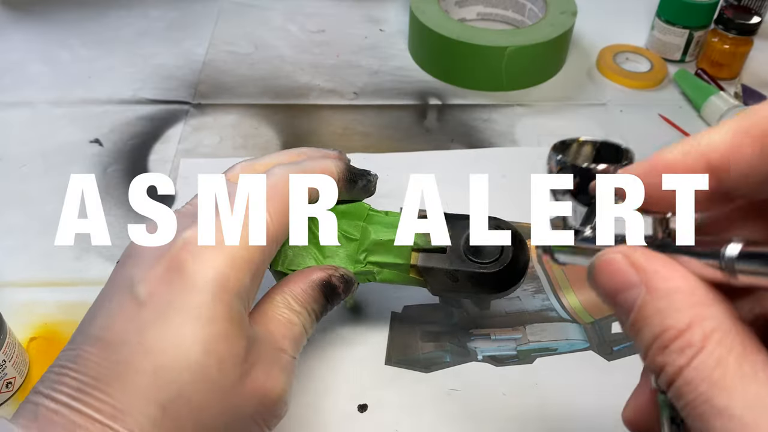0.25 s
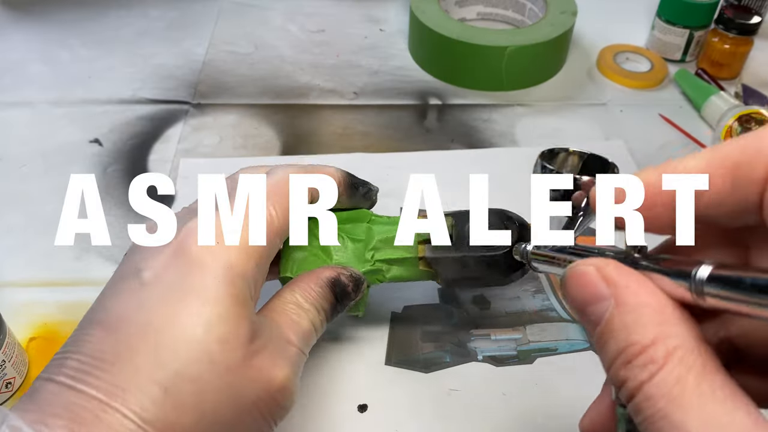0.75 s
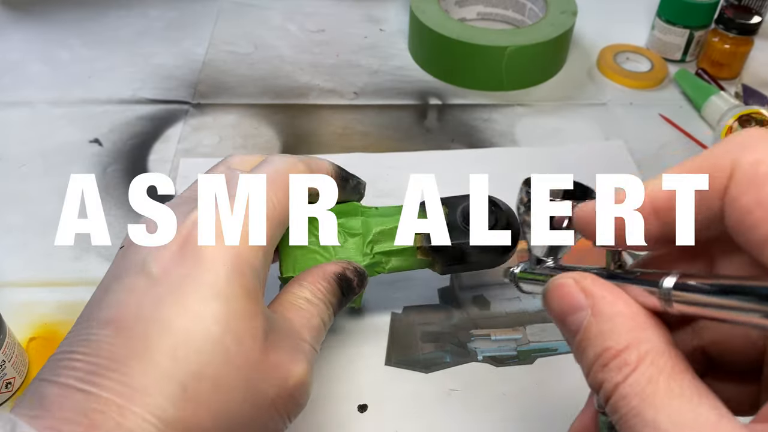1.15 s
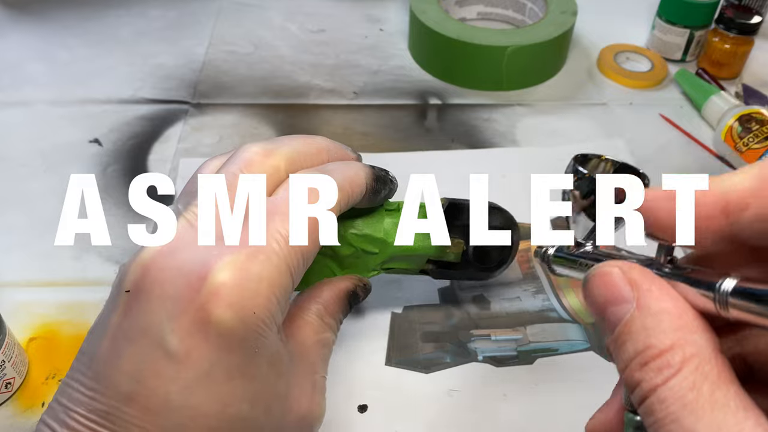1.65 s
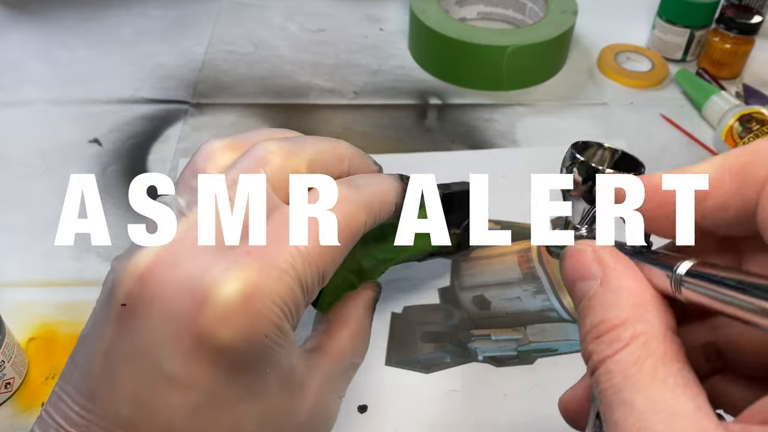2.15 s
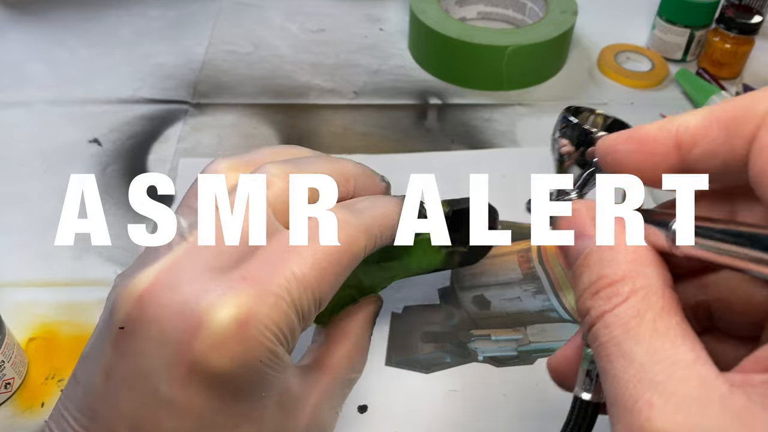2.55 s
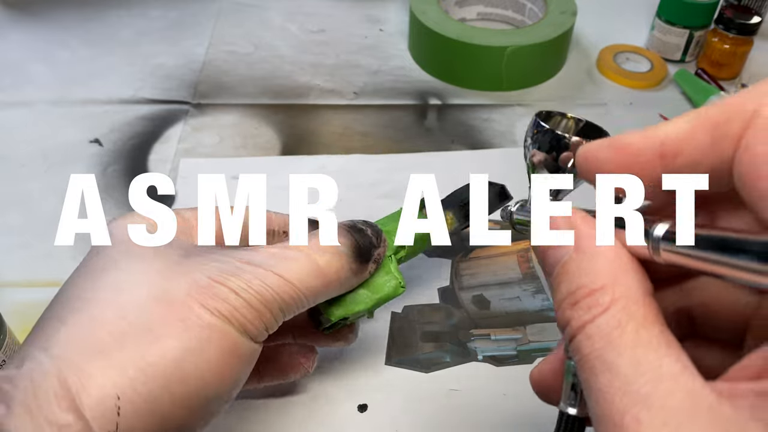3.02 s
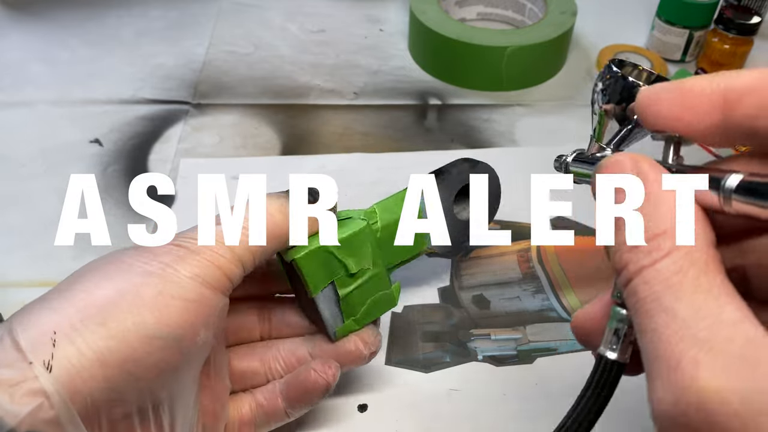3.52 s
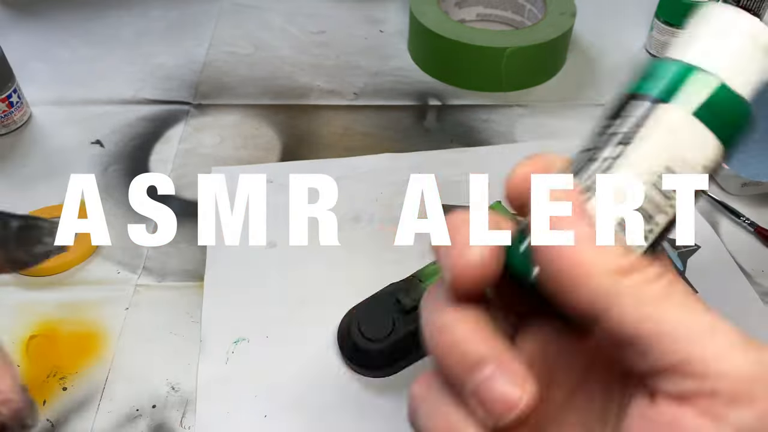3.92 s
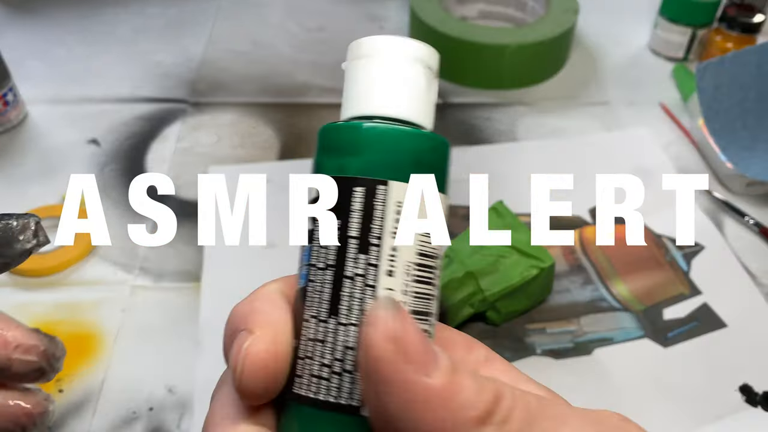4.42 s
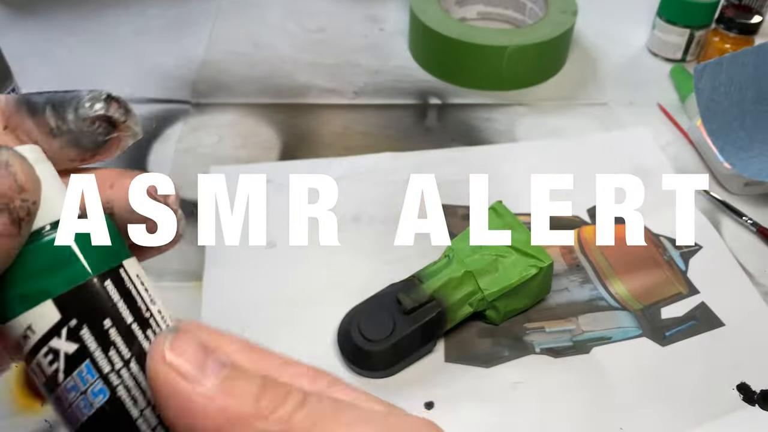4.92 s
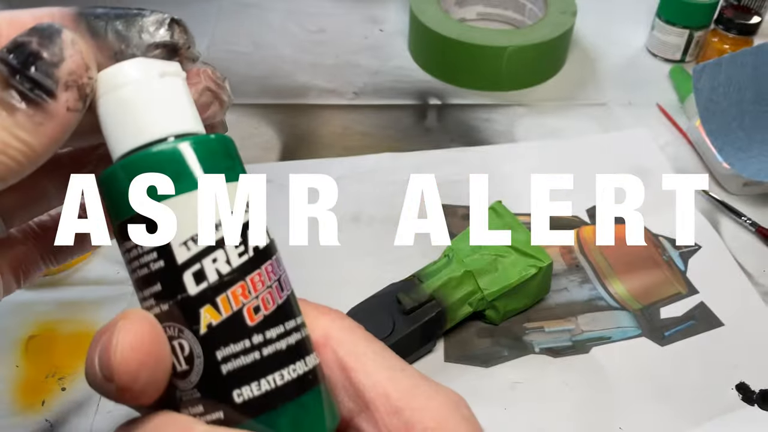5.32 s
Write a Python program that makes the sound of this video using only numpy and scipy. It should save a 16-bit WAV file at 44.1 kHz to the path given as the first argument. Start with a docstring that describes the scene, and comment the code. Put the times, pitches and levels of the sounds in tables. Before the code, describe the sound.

An airbrush hisses in six short bursts over a faint buzzing compressor with a steady high tone, then fingers rub and tap a plastic bottle.

```python
"""An airbrush sprays a small model part in six short bursts: turbulent jet noise, gated by a valve.
From the start its piston compressor buzzes, strokes exciting housing modes near 2 kHz, beside valve and fan.
After four bursts the trigger clicks as it springs back; the compressor sound fades before the last burst.
Then gloved fingers turn a plastic paint bottle: friction noise and small impacts.
Behind them lies low room noise, stronger near the end, where a faint electronic whine joins it."""
import sys
import numpy as np
from scipy import signal
from scipy.fft import rfft, irfft
from scipy.io import wavfile
from scipy.ndimage import uniform_filter1d, map_coordinates

SR = 44100
rng = np.random.default_rng(int(sys.argv[2]) if len(sys.argv) > 2 else 0)


def master(y):
    """Save y as 16-bit WAV."""
    cut = np.clip(np.atleast_2d(y).T, -1, 1)
    pcm = np.round(cut * 32767)  # scale
    wavfile.write(sys.argv[1], SR, pcm.astype(np.int16))


N = 245637
T = np.arange(N) / SR  # s
HZ = np.maximum(np.fft.rfftfreq(N, 1 / SR), 1)  # kept above zero for the logarithm
BOTTLE_S = 3.945  # s, spraying is over; the room noise steps up and the whine begins

# Trigger pulls: air on t/s, air off t/s, opening time t/s, closing time t/s, then levels at the usual jet:
# low rush at start level/dB, at end level/dB, edge turbulence at start level/dB, at end level/dB
PULLS = [(-.05, 0.315, .01, 0.01, -48, -46, -40, -44), (0.526, 1.236, 0.012, 0.0076, -46, -54, -41, -38),
         (1.44, 1.793, 0.0032, 0.0097, -41.5, -44.5, -37, -43),
         (1.999, 2.623, 0.0067, 0.017, -46.5, -45, -41.5, -38),
         (2.931, 3.282, .014, 0.007, -43.5, -40, -38.5, -37),
         (3.653, 3.944, 0.013, 0.0017, -45, -46, -46.5, -44)]
# Spectrum of the turbulent air: f/Hz, level/dB
SPRAY_COLOUR = [(50, -55), (110, -26), (250, -15), (520, -4.5), (1150, -2), (1700, 5.5), (2350, 2),
                (3100, 3), (4200, -3), (5500, 1), (7200, -1), (10200, -2), (13000, -4.5), (16000, -0.5)]


def amp(db):
    """Level definition: decibels to amplitude ratio."""
    return 10 ** (np.asarray(db) / 20)


def rms(x):
    """Effective value: root mean square, kept above zero."""
    return np.sqrt(np.mean(x ** 2)) + 1e-12


def curves(rows):
    """Linear interpolation: each column of a table joined by straight lines in time."""
    s, *columns = np.transpose(rows)
    return [np.interp(T, s, c) for c in columns]


def shape(points):
    """Spectral envelope: gain at every frequency, in dB linear over log frequency."""
    hz, db = np.transpose(points)
    return amp(np.interp(np.log(HZ), np.log(hz), db))


def colour(x, gain):
    """Linear filtering: multiply the spectrum by a gain for every frequency."""
    return irfft(rfft(x) * gain, N)


def noise(gain):
    """Filtered white noise: a random signal of the given spectrum and rms 1."""
    x = colour(rng.standard_normal(N), gain)
    return x / rms(x)


def walk(rate):
    """Low-pass noise: a smooth random fluctuation of rms 1, moving about rate times a second."""
    return noise(1 / (1 + (HZ / rate) ** 4))


def swell(start, end):
    """Smooth window: one rise and fall, 0-1, with soft skirts."""
    away = (2 * T - start - end) / (end - start)
    return 1 / np.sqrt(1 + (1.25 * away) ** 8)


def ring(x, hz, width_hz):
    """Simple resonance: one mode of given frequency and bandwidth."""
    hz, width_hz = min(hz, .45 * SR), min(width_hz, .3 * SR)
    b, a = signal.iirpeak(hz, hz / width_hz, fs=SR)
    return signal.lfilter(b, a, x)


def steer(x, bands, levels_db):
    """Band levels: each band of x follows its own moving level, blended smoothly between centres."""
    centres = np.log(bands).mean(axis=1)
    out = 0
    for (lo, hi), db, share in zip(bands, levels_db, np.eye(len(bands))):
        part = colour(x, np.interp(np.log(HZ), centres, share))
        band_rms = rms(colour(x, (HZ > lo) & (HZ < hi)))
        out = out + part * amp(db) / band_rms
    return out


def tick(s, db, hz, t60, spread):
    """Impact excitation: a fast-dying noise crack drives two equal broad resonances in turn."""
    age = T[:SR // 10]
    crack = rng.standard_normal(len(age)) * amp(-60 * age / max(t60, .001))
    x = ring(ring(crack, hz, spread * hz), hz, spread * hz)
    out, start = np.zeros(N + len(age)), int(s * SR)
    out[start:start + len(age)] = x * amp(db) / np.abs(x).max()
    return out[:N]


def reflect(x, delay_ms, drift, echo_db):
    """Comb interference: an echo off a near surface, whose peaks slide as the hands move."""
    lag = delay_ms / 1000 * SR * np.exp(drift * walk(2.75))
    echo = map_coordinates(x, [np.arange(N) - lag], order=3, mode="nearest")
    return x + amp(echo_db) * echo


def spray(opening, flutter_db=0.24, spit_db=.5, sway_db=0.65):
    """Jet turbulence: air hisses at the nozzle, flutters on the part and echoes off hand and bench."""
    # Narrow humps of the nozzle: f/Hz, width f/Hz, level/dB
    nozzle_humps = [(6160, 330, 2.5), (8300, 800, 3), (11830, 1400, 3.5), (14200, 600, 4.5)]
    rush, edge, sizzle, hiss = jet_levels()
    humps_db = sum(db * np.exp(-2 * ((HZ - hz) / width) ** 2) for hz, width, db in nozzle_humps)
    air = noise(shape(SPRAY_COLOUR) * amp(humps_db))
    air = reflect(air, delay_ms=0.333, drift=0.14, echo_db=-18)
    air = reflect(air, delay_ms=1.1, drift=.08, echo_db=-13)
    # the unsteady hand sways the noise made on the surface
    flutter = flutter_db * walk(70) + sway_db * walk(12)
    spit = spit_db * walk(150)
    bands = [(250, 1300), (2500, 3800), (4800, 7500), (8000, 15500)]  # Hz
    return opening * steer(air, bands, [rush + flutter, edge + flutter, sizzle + spit, hiss + spit])


def jet_levels():
    """Jet scaling: levels in dB of low rush, edge turbulence, sizzle and hiss follow jet strength."""
    # Strength of the jet on the part as the nozzle moves nearer and farther, one curve a pull:
    # t/s, level/dB
    jet_1, jet_2, jet_3 = [(0.0, -33), (0.3, -32.5)], [(0.54, -33.5), (0.65, -32), (0.682, -38), (0.742, -31),
                                          (0.882, -34), (0.958, -29), (1.106, -31.5), (1.148, -30),
                                          (1.225, -31)], [(1.452, -36.5), (1.604, -32), (1.636, -35),
                                                         (1.778, -34)]
    jet_4, jet_5, jet_6 = [(2.012, -40), (2.34, -37), (2.606, -35.5)], [(2.948, -35), (3.008, -39), (3.094, -30), (3.22, -32),
                                          (3.272, -28.5)], [(3.668, -37.5), (3.692, -38.5), (3.758, -28.5),
                                                         (3.832, -28.5), (3.936, -30)]
    # Short whooshes where the jet catches a hollow or a ridge of the part:
    # start t/s, end t/s, extra low rush level/dB, extra edge turbulence level/dB
    whooshes = [(0.211, 0.253, 6.5, -4), (0.66, 0.722, 4, 2.5), (1.185, 1.225, 0, 3.5),
                (2.347, 2.379, 0.5, 3.5), (2.512, 2.577, 1, 3), (3.708, 3.78, 5, 8)]
    usual_db = -33
    sizzle_db, hiss_db = -7, -.6  # relative to the jet
    # dB in each band per dB of jet: a stronger jet thins the low rush and raises the rest
    rush_slope, edge_slope, sizzle_slope, hiss_slope = -.2, 1.15, 1.25, 0.89
    whoosh_sizzle = 0.28  # share of the extra edge dB that reaches the sizzle

    jet = curves(np.vstack([jet_1, jet_2, jet_3, jet_4, jet_5, jet_6]))[0] - usual_db
    # through a pull the aim drifts evenly from one kind of surface to another
    aim = []
    for on, off, _, _, rush_start, rush_end, edge_start, edge_end in PULLS:
        aim += [(on, rush_start, edge_start), (off, rush_end, edge_end)]
    rush, edge = curves(aim)
    hollow, ridge = sum(np.outer(extra_db, swell(start, end)) for start, end, *extra_db in whooshes)
    rush = rush + hollow + rush_slope * jet
    edge = edge + ridge + edge_slope * jet
    sizzle = usual_db + sizzle_db + sizzle_slope * jet + whoosh_sizzle * ridge
    hiss = usual_db + hiss_db + hiss_slope * jet
    return rush, edge, sizzle, hiss


def air_valve(leak_db=-17, leak_s=0.013, vent_db=-21, vent_s=0.024):
    """Flow control: valve opening, 0-1; it leaks before each pull and the air behind it drains after."""
    opening = 0
    for on, off, rise, fall, *_ in PULLS:
        main = np.clip(np.minimum((T - on) / rise, (off - T) / fall), 0, 1)
        seep = amp(leak_db) * np.clip((T - on + leak_s) / leak_s, 0, 1) * (T < off)
        drain = amp(vent_db) * np.exp(-np.abs(T - off) / vent_s) * (T >= off)
        opening = opening + np.maximum(main, (seep + drain) * (T < BOTTLE_S))
    return opening


def wisps(high_db=-59, low_db=-54, low_hz=600):
    """Weak turbulence: a thin wisp of air as the compressor sound fades, a soft puff before the last burst."""
    wisp = noise(np.minimum(HZ / 15000, 1)) * swell(3.555, 3.590)
    puff = noise(shape(SPRAY_COLOUR) / (1 + HZ / low_hz))
    puff = puff * swell(3.624, 3.660)
    return amp(high_db) * wisp + amp(low_db) * puff


def compressor(opening, scatter=0.17, clack=0.9, clack_turn=.27, mode_width_hz=16, rattle_db=-46,
               loose=0.17, open_turn=0.29, gate_depth=0.25, fan_hz=294.8, fan_db=-64):
    """Forced vibration: piston strokes ring the housing and rattle the valves; the cooling fan hums."""
    # Modes of the housing: f/Hz, rms level/dB ahead of the pump gain
    housing_modes = [(165, -77.5), (385, -74), (440, -74.5), (495, -65.5), (550, -65.5), (606, -66),
                     (770, -76), (880, -64.5), (1046, -69), (1212, -61), (1266, -69), (1652, -71),
                     (1707, -66), (1873, -60), (1960, -60), (2038, -48), (2093, -48.5), (2164, -56),
                     (2258, -50), (2314, -59), (2420, -56), (2589, -68), (2698, -69), (2810, -68),
                     (3461, -73), (3768, -66), (4210, -70), (4484, -63), (4592, -68)]
    # Spectrum of the valve rattle: f/Hz, level/dB
    rattle_colour = [(80, -46), (160, -26), (700, -28), (1100, -21), (1520, -21), (1850, -13.5), (2180, 1),
                     (2450, -10), (3200, -25), (4000, -23), (4450, -17), (5100, -33), (5700, -35),
                     (6300, -31), (7200, -36), (9700, -37.5), (10600, -31), (12000, -38), (16000, -39)]
    # back pressure slows the motor a little while the air valve is shut
    stroke_hz = 54.96 + .27 * uniform_filter1d(opening, SR // 10)
    turns = np.cumsum(stroke_hz) / SR
    # every turn brings a piston knock and, a little later, a valve clack
    knock, shut = (np.diff(np.floor(turns - late), prepend=np.floor(-late)) for late in (0, clack_turn))
    strokes = (knock + clack * shut) * (1 + scatter * rng.standard_normal(N))
    housing = 0
    for k, (hz, db) in enumerate(housing_modes):
        mode = ring(ring(strokes, hz, mode_width_hz), hz, 170)
        housing = housing + (-1) ** k * amp(db) * mode / rms(mode)  # neighbours in opposite sign
    # the rattle swells once a turn, while air passes the valve, and nearly repeats every third turn
    clatter = rng.standard_normal(2400)[(turns % 3 * 800).astype(int)]
    flow = 1 + gate_depth * np.cos(2 * np.pi * (turns - open_turn))
    rattle = colour((clatter + loose * rng.standard_normal(N)) * flow, shape(rattle_colour))
    rattle = amp(rattle_db) * rattle / rms(rattle)
    fan = np.sqrt(2) * amp(fan_db + walk(4.3)) * np.sin(2 * np.pi * fan_hz * T)
    return (housing + rattle + fan) * pump_level()


def pump_level(start_db=-1.08, rise_db_per_s=0.54, fade_s=3.575, fade_db_per_s=400.5):
    """Exponential envelope: a slow rise, then a quick fade-out of the compressor sound from fade_s."""
    return amp(start_db + rise_db_per_s * T - fade_db_per_s * np.maximum(T - fade_s, 0))


def trigger(snap_db=2, ring_db=-21):
    """Impact and free decay: the valve snaps shut and the metal body rings briefly."""
    # Trigger springing back: t/s, reference level/dB, centre f/Hz
    springs = [(0.338, -22, 11500), (1.2484, -25.5, 10330), (1.8124, -30, 10000), (3.2995, -24.5, 11000)]
    clicks = 0
    for s, db, hz in springs:
        clicks = clicks + tick(s, db + snap_db, hz, t60=0.0065, spread=0.83)
        clicks = clicks + tick(s, db + ring_db, hz, t60=0.071, spread=.7)
    return clicks


def handling(grain_db=1.5, grip_db=1.3, scrape_width_hz=600, scrape_db=-7.5, creak_s=4.977,
             slip_s=0.0056, creak_db=-41.5, creak_hz=2100, crack_db=-11):
    """Friction and stick-slip: fingers rub and tick on the plastic, with one short creak."""
    # Spectrum of the rubbing: f/Hz, level/dB
    rub_colour = [(150, -9.5), (400, -4), (750, -13), (1050, -1), (3500, -0.5), (5800, -1.5), (8200, -3),
                  (9500, -1.5), (12500, -2), (16000, -8.5)]
    # Fingers sliding on glove and bottle: start t/s, end t/s, relative level/dB, scrape pitch f/Hz
    rubs = [(3.924, 4.08, -56.5, 2020), (4.264, 4.327, -57.5, 3000), (4.35, 4.528, -62.5, 2700),
            (4.566, 4.722, -60, 5550), (4.77, 4.8, -55.5, 4130), (4.795, 4.885, -57, 5760),
            (4.877, 4.988, -53, 2020), (5.014, 5.099, -52.5, 5600), (5.085, 5.211, -58, 1190),
            (5.198, 5.316, -60.5, 9100)]
    # Knocks on the bottle: t/s, peak level of the ring/dB, centre f/Hz, ring decay time t60/s
    bottle_knocks = [(4.077, -37, 3400, .012), (4.097, -48, 2010, .016), (4.11, -41, 2020, .028),
                     (4.128, -41.5, 2400, .038), (4.627, -39, 2800, .013), (4.640, -47.5, 3000, .05)]
    # Sharp snaps of glove and plastic: t/s, peak level/dB
    sharp_snaps = [(2.764, -41), (4.002, -30.5), (4.010, -36), (4.021, -42), (4.081, -34.5), (4.786, -46),
                   (5.245, -47)]
    hiss = reflect(noise(shape(rub_colour)), delay_ms=0.606, drift=.15, echo_db=-14)
    rub = 0
    for start, end, db, hz in rubs:
        scrape = noise(1 / (1 + (2 * (HZ - hz) / scrape_width_hz) ** 2))
        rub = rub + amp(db) * swell(start, end) * (hiss + amp(scrape_db) * scrape)
    # finger pressure wavers slowly, the surface grain quickly
    rub = rub * amp(grip_db * walk(25) + grain_db * walk(200) - 3)
    # a knock is a short crack and a narrow ring of the bottle; a snap is only a broad crack
    knocks = 0
    for s, db, hz, t60 in bottle_knocks:
        knocks = knocks + tick(s, db + crack_db, hz, t60=.006, spread=1.3)
        knocks = knocks + tick(s, db, hz, t60, spread=0.46)
    snaps = sum(tick(s, db, hz=7160, t60=0.012, spread=1.5) for s, db in sharp_snaps)
    # seven slips, each weaker than the one before
    creak = sum(tick(creak_s + k * slip_s, creak_db - 1.4 * k, creak_hz, t60=0.0048, spread=1.3)
                for k in range(7))
    return rub + knocks + snaps + creak


def room(room_db=-70, whine_hz=9968, whine_db=-82.5):
    """Stationary noise and a pure tone: low room noise, louder from BOTTLE_S on, when the whine joins."""
    # Spectrum of the room noise: f/Hz, level/dB
    room_colour = [(25, -14.5), (80, -2), (330, -4), (1200, -12.5), (4000, -20), (12000, -25), (16000, -37)]
    late = T > BOTTLE_S
    whine = np.sqrt(2) * amp(whine_db) * np.sin(2 * np.pi * whine_hz * T) * late
    return noise(shape(room_colour)) * amp(room_db + np.where(late, -.3, -8)) + whine


def scene():
    """Superposition: all sources add at one microphone, the same in both channels."""
    opening = air_valve()
    mono = spray(opening) + wisps() + compressor(opening) + trigger() + handling() + room()
    return np.array([mono, mono])


def record(dry, top_hz=15850):
    """Band limiting: the recorder cuts the top steeply with an elliptic low-pass."""
    return signal.sosfilt(signal.ellip(12, .1, 80, top_hz, fs=SR, output="sos"), dry)


dry = scene()
out = record(dry)
master(out)
```